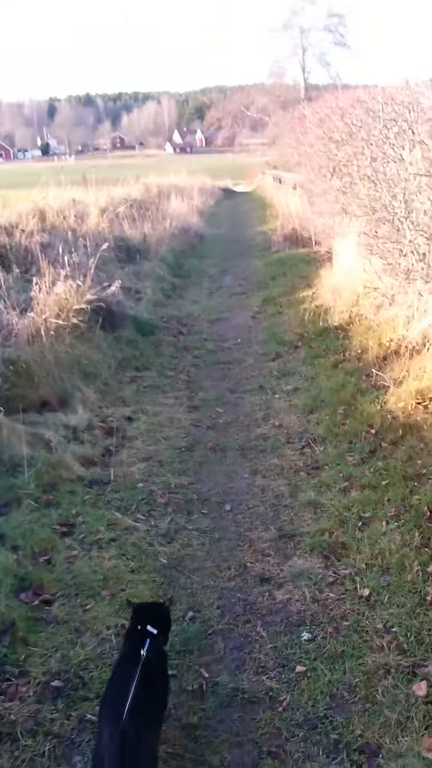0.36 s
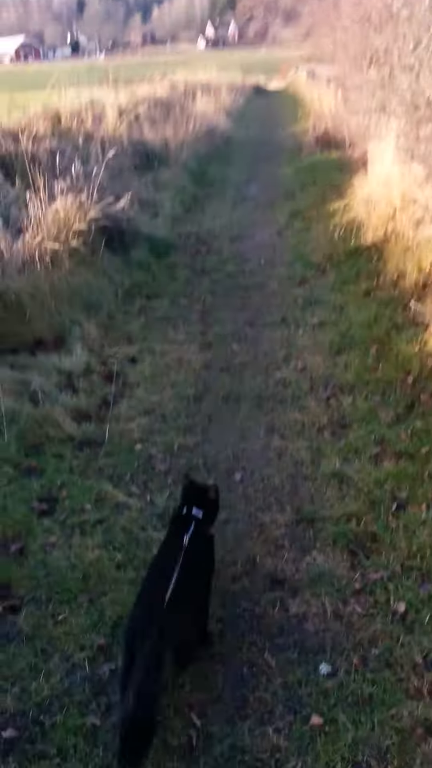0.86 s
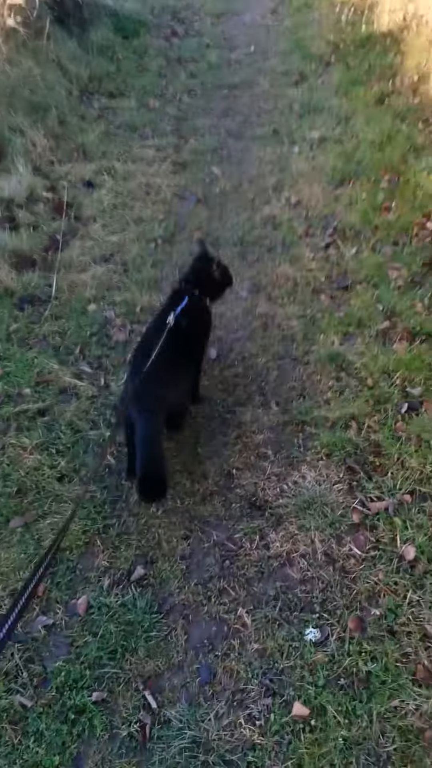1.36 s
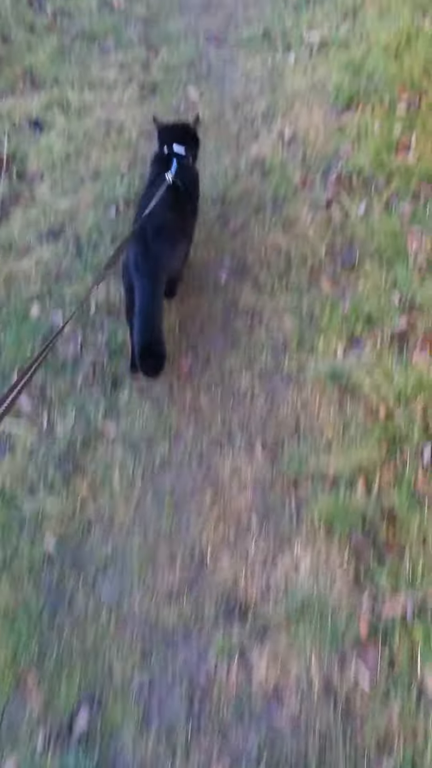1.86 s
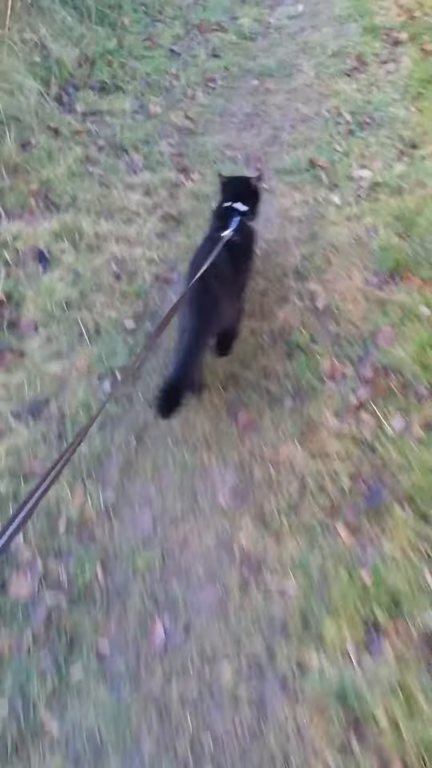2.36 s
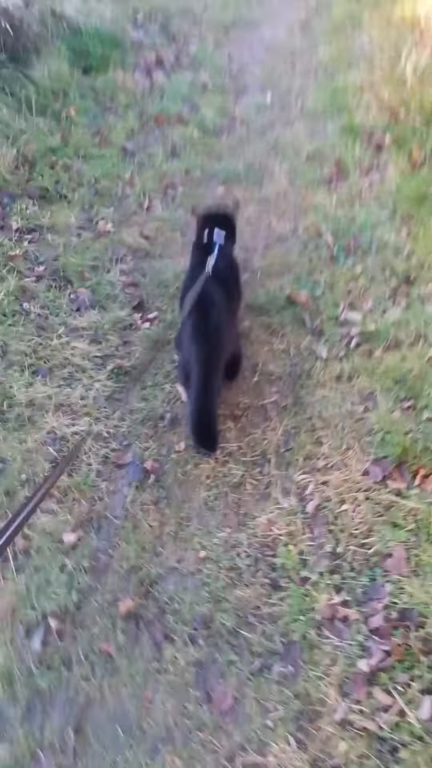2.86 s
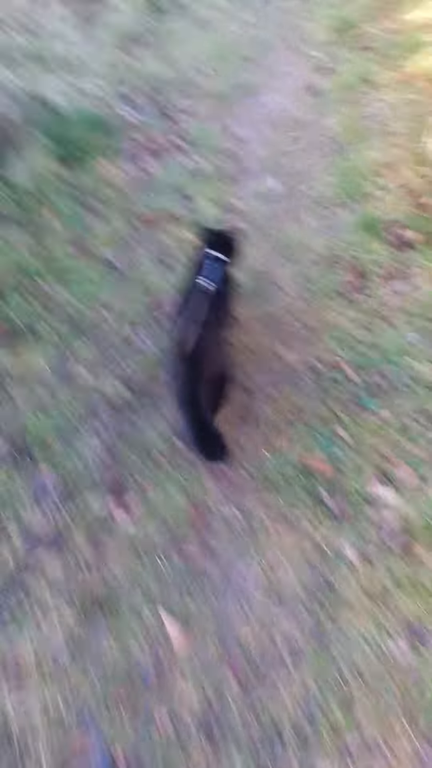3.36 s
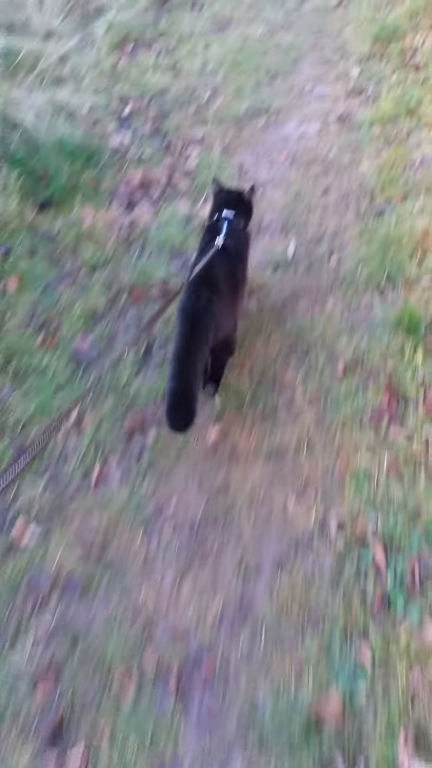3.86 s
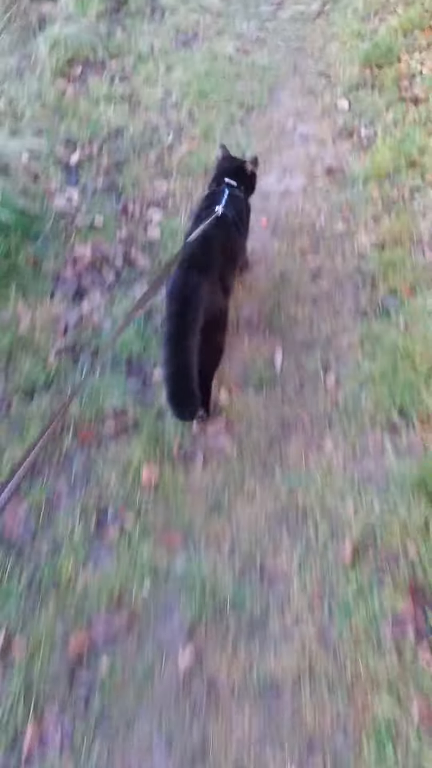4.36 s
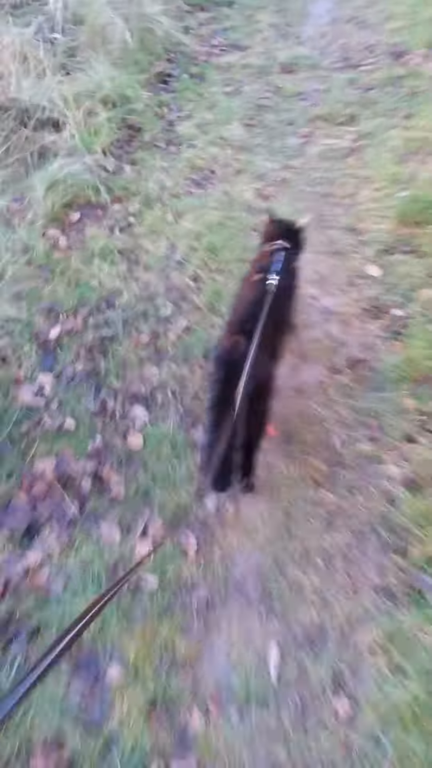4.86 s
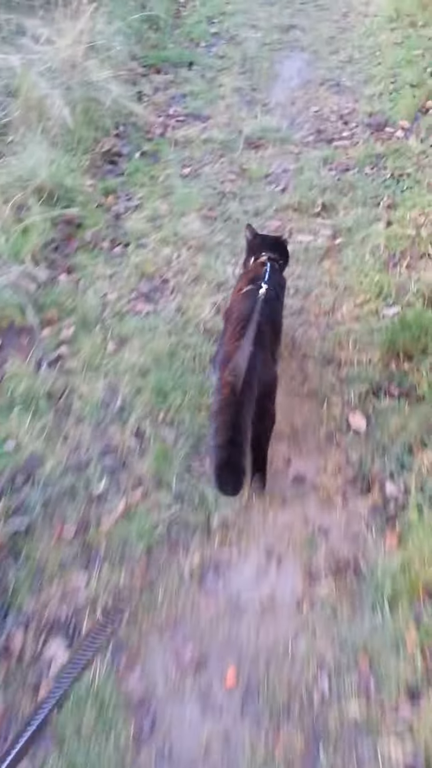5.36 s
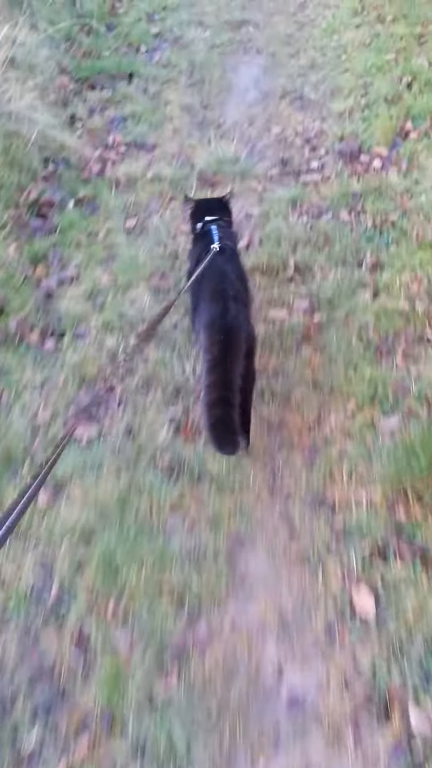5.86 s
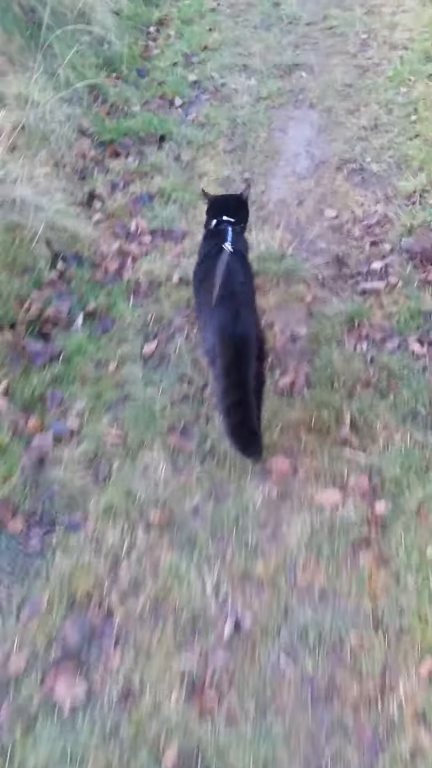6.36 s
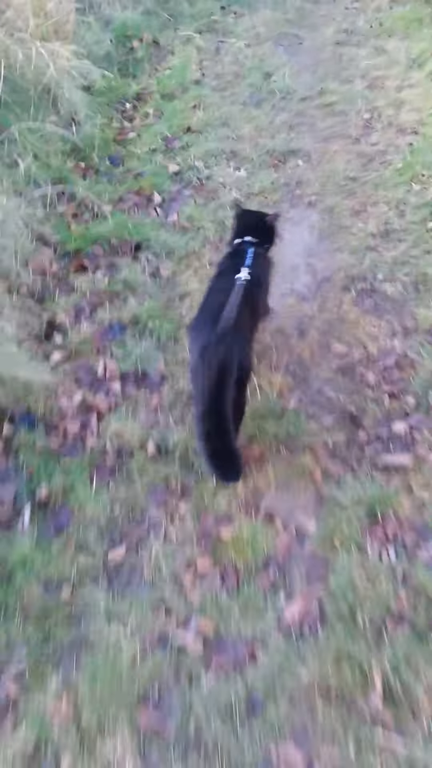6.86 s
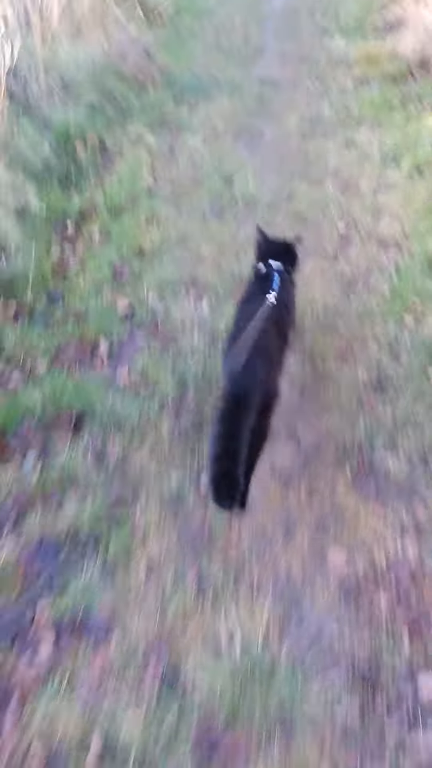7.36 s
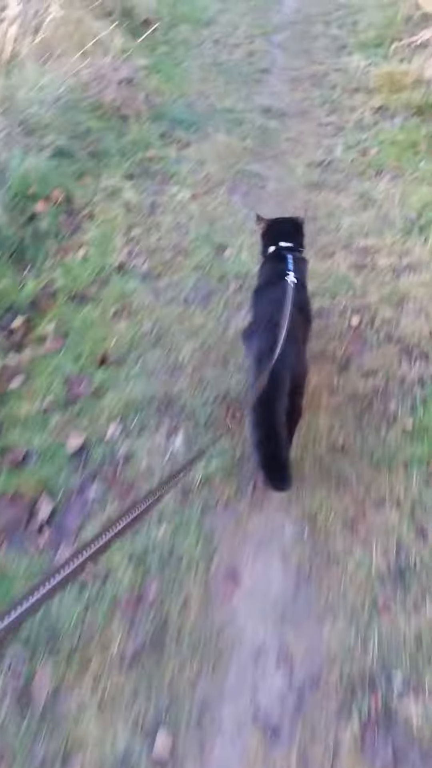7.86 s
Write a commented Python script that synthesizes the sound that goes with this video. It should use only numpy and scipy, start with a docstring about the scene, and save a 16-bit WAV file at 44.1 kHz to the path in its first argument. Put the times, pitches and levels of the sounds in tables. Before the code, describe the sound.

Brisk, uneven swishes of someone striding through dry grass and leaves, with crisp crackles, faint tag ticks, small wind thumps and distant traffic hum.

```python
"""Frosty grass path amid fields: a walker follows a cat on a lead, in the hand a phone with two microphone ports.
Each stride swishes through grass and leaves: rubbed noise, levelled stroke by stroke, with small leaf cracks.
Stalks and leaves snap and rustles start sharply (tick, mode, band of noise); a harness tag tinks (damped modes).
Puffs of air thump on one port or the other (filtered pulses) over a weak flutter (low noise).
Far traffic hums (coloured noise) and a faint tone comes and goes (swept sine)."""
import sys
import numpy as np
from scipy import signal
from scipy.fft import rfft, irfft
from scipy.io import wavfile
from scipy.ndimage import uniform_filter1d

SR = 44100
rng = np.random.default_rng(int(sys.argv[2]) if len(sys.argv) > 2 else 0)


def file_out(sig):
    """Save sig as 16-bit WAV at sys.argv[1]."""
    # one column per channel
    cols = np.atleast_2d(sig).T
    # limit, then scale
    lim = np.clip(cols, -1, 1)
    pcm = np.round(lim * 32767).astype(np.int16)
    wavfile.write(sys.argv[1], SR, pcm)


def invert_db(x):
    """Field ratio 10**(x/20) for x, a level in decibels (scalar or array-like)."""
    u = np.asarray(x, float) / 20
    return 10 ** u


N = 363825
T = np.arange(N) / SR
CONTROL_STEP = 64  # samples per control value

# strokes of a leg or sleeve through cloth, grass and leaves:
# (start [s], length [s], hiss at the start [dB], swell to the end [dB], left minus right [dB])
STROKES = [(0.01, 0.23, -45.5, -10.5, 7), (0.159, 0.16, -47, 4, 5), (0.47, 0.11, -49.5, -3.5, 5),
           (0.634, 0.052, -50, -10, 3), (0.791, 0.053, -45, -2.5, 6.0), (0.856, 0.12, -39.5, -3, 7),
           (0.998, 0.12, -48, -9, 5.5), (1.155, 0.079, -47.5, -12, 3.5), (1.284, 0.025, -51.0, 12, 2),
           (1.36, 0.18, -55.5, 16, 4.5), (1.433, 0.17, -46.0, 8, 9), (1.749, 0.21, -47.5, -9.5, 5),
           (1.968, 0.028, -54.5, 4, 4), (2.083, 0.13, -44.5, -1.5, 3.0), (2.323, 0.058, -53.5, -1.0, 6.0),
           (2.435, 0.13, -57.5, 8, 7.5), (2.717, 0.061, -47, 4.5, 6.0), (2.79, 0.058, -38, 1.5, 9),
           (2.988, 0.21, -47.0, -1.0, 6.0), (3.212, 0.13, -53.5, -7.5, 10), (3.417, 0.11, -41.5, 0.5, 5.5),
           (3.575, 0.17, -50.5, 1.5, 6), (3.79, 0.16, -49, -5, 8), (4.072, 0.15, -41.5, -0.5, 6.5),
           (4.325, 0.1, -51.5, 0, 7), (4.466, 0.18, -42, -20.5, 3.5), (4.732, 0.099, -42, -1, 6.5),
           (4.967, 0.21, -52.5, 6.5, 9.5), (5.206, 0.053, -46, -4, 9), (5.435, 0.12, -43.5, 3.5, 8),
           (5.676, 0.21, -53.5, 1.5, 6), (5.929, 0.011, -52.0, 0, 5), (5.992, 0.049, -55, 0.5, 9.5),
           (6.125, 0.091, -43.5, -1, 3.5), (6.394, 0.2, -50.5, 0.5, 6.5), (6.567, 0.21, -47.5, -19.5, 2.5),
           (6.765, 0.11, -47.0, 7.5, 6), (6.9, 0.043, -44, -4, 9), (7.034, 0.038, -49.5, -1, 10),
           (7.157, 0.24, -48.5, 0, 7.0), (7.458, 0.06, -45, 7, 10.5), (7.535, 0.082, -42, -9.5, 9),
           (7.662, 0.24, -54.5, 9.5, 10), (7.926, 0.12, -45.5, -6.0, 10.5), (8.161, 0.064, -46.5, 6, 8.5)]
# slow changes of the swish's colour: (time [s], lift of the lower hiss [dB], lift of the dull part [dB])
SWISH_COLOUR = [(0, -7, -2.5), (0.9, -3.5, 0), (1.5, -1.5, -1), (2.4, 1.5, 0.5), (3.3, 0, 0),
                (4.3, -1, -0.5), (5.1, 0.5, 1.5), (6.2, 1.5, -1), (7.1, 2.5, -1.5), (7.8, 4.5, 3.5),
                (8.25, 9.5, 3)]
# snaps of stalks and leaves, sharp onsets of rustles, two low scuffs and a tag tink near 5.72 s,
# level ahead of the common gain and the ports:
# (time [s], level [dB], ring [Hz], ring t60 [s], left minus right [dB])
SHARP_ONSETS = [(0.44, -48.5, 500, 0.013, 1), (0.549, -34, 8000, .002, 5),
                (0.6237, -26.5, 4100, 0.0056, -1), (0.628, -27.5, 4200, 0.0037, 25),
                (0.633, -42, 5200, 0.011, 1), (1.1526, -27, 5800, 0.0013, 8), (1.41, -34, 5770, 0.012, -8),
                (1.28, -39, 5540, 0.0064, 2), (1.313, -37, 6160, 0.011, 7), (1.76, -47, 464, 0.013, 6),
                (3.3854, -44, 5970, 0.011, -5), (4.463, -34, 7060, 0.006, -10),
                (4.4635, -32, 3000, 0.0049, 3), (4.4657, -24.5, 3600, 0.007, 2),
                (4.484, -38, 3740, .015, 6), (4.498, -33, 3900, 0.013, 10),
                (4.5092, -21.5, 3180, 0.006, -5), (4.552, -35.5, 3230, 0.0039, 6),
                (4.5545, -36, 5850, 0.0066, 1), (5.414, -44, 5800, 0.0074, -3),
                (5.717, -43, 5630, 0.0092, 3), (5.927, -47, 5800, 0.0073, 5), (6.098, -48, 6170, .008, 7),
                (6.155, -41, 6340, .012, 3), (6.212, -39.5, 6260, .015, 3), (6.5491, -41.5, 6600, 0.023, 3),
                (6.7243, -44, 7000, .015, 3), (6.7596, -45, 6680, 0.012, 3),
                (7.015, -30.5, 10300, 0.0035, 15), (7.1482, -24, 8700, 0.0017, 18),
                (8.089, -46.5, 2860, 0.0034, 7)]
# knocks of the tag on the harness, ahead of the port gains: (time [s], level [dB])
TAG_KNOCKS = [(0.469, -45), (1.43, -41), (1.447, -47), (1.836, -43), (2.513, -48), (3.495, -46),
              (4.427, -50), (5.723, -48), (5.74, -47), (6.414, -50), (6.452, -45), (6.481, -48),
              (6.922, -51), (6.968, -43), (7.208, -50), (7.732, -50)]
# modes of the tag: (nominal pitch [Hz], relative level [dB], t60 [s])
TAG_MODES = [(4915, 0, .03), (4935, -10, .13)]
# eddies that hit one port: (time [s], peak [dB], port [0 left, 1 right])
PUFFS = [(0.074, -47, 0), (0.26, -48, 1), (0.627, -38, 1), (0.738, -33, 0), (0.807, -40, 0),
         (0.846, -32, 1), (0.906, -41, 0), (0.908, -30, 1), (1.27, -45, 1), (1.269, -41, 0),
         (1.308, -44, 0), (1.333, -43, 0), (2.51, -41, 0), (3.315, -40.5, 1), (3.992, -47, 0),
         (4.129, -43, 0), (4.801, -38.5, 0), (5.934, -41, 0), (6.684, -45.5, 0), (6.788, -51, 0),
         (6.832, -46, 0), (7.15, -45, 0), (7.864, -35.5, 0), (7.891, -33.5, 0), (7.925, -32, 0),
         (7.995, -41, 0), (8.026, -42, 0), (8.057, -38.5, 0), (8.214, -48, 1)]
# gusts on the phone: (start [s], length [s], left port [dB], right port [dB])
GUSTS = [(0.07, 0.14, -68, -72), (0.74, 0.027, -52.5, -57), (0.84, 0.058, -49.5, -54),
         (1.297, 0.05, -56, -58), (2.51, 0.026, -59, -80), (2.734, 0.039, -66, -76), (3.983, .18, -60, -73),
         (4.78, .08, -59, -73), (5.228, 0.34, -64.5, -77), (5.897, 0.043, -54, -77),
         (6.047, 0.045, -55, -70), (6.697, 0.15, -60.5, -71), (7.394, .16, -63, -68), (7.89, .06, -44, -56),
         (7.957, 0.086, -49, -63), (8.2, .06, -59, -61)]
# far tone: (time [s], pitch [Hz], level [dB])
DRONE = [(2.95, 362.5, -84), (3.5, 352, -75), (3.95, 351, -75)]
# spectrum of the fields: (frequency [Hz], relative density [dB per Hz])
FIELDS = [(88, -36.5), (150, -5), (545, -6.5), (1020, 8), (2180, -6), (4160, -17), (5850, -14),
          (9400, -9.5), (14000, -2.5)]
# swell and fade of the far traffic: (time [s], gain [dB])
TRAFFIC = [(0, 1.5), (2, -0.5), (4.5, 1), (6.3, -1.5), (8.25, 0)]
# small cavity ahead of each port: (frequency [Hz], left gain [dB], right gain [dB])
PORTS = [(190, -8, -12.5), (1170, -6, -8.5), (2090, -6, -11.5), (3050, -9, -10), (4050, -9, -11),
         (4700, -7, -11), (5830, -1.5, -7), (6960, -6, -1), (8000, -10, -8), (9400, -12.5, -11),
         (13200, -13.5, -18.5), (15700, -12.5, -18)]


def level(x, db=0):
    """Scale each channel to an rms level."""
    return x * invert_db(db) / np.sqrt(np.mean(x ** 2, axis=-1, keepdims=True))


def curves(table):
    """Columns of a table as one value per sample."""
    time_s, *columns = np.transpose(table)
    return [np.interp(T, time_s, column) for column in columns]


def sides(db, pan_db):
    """Left and right gains of unrelated sounds whose mean has the level db."""
    tilt = invert_db(np.array([pan_db, -pan_db]) / 2)
    return 2 * invert_db(db) * tilt / np.sqrt(invert_db(pan_db) + invert_db(-pan_db))


def colour(x, hz, db):
    """Causal filter through (Hz, dB) points, from the cepstrum of the log gain."""
    grid_hz = np.arange(513) * SR / 1024
    gain_db = np.interp(np.log(grid_hz + 1), np.log(hz), db)
    cepstrum = irfft(np.log(invert_db(gain_db)))
    # fold the negative times onto the positive ones
    cepstrum[1:512] *= 2
    cepstrum[513:] = 0
    impulse = irfft(np.exp(rfft(cepstrum)))
    return signal.fftconvolve(x, impulse)[:N]


def ports(x):
    """Colour of the two port cavities."""
    hz, left_db, right_db = np.transpose(PORTS)
    return np.array([colour(x[0], hz, left_db), colour(x[1], hz, right_db)])


def cut(x, hz, kind, order=2):
    """Causal Butterworth filter."""
    return signal.sosfilt(signal.butter(order, hz, kind, fs=SR, output="sos"), x)


def part(x, hz, kind):
    """A part of the spectrum, in phase with the whole."""
    return signal.sosfiltfilt(signal.butter(2, hz, kind, fs=SR, output="sos"), x)


def walk(rate_hz):
    """Random levels held 1 / rate_hz and slewed twice."""
    hold = int(SR / rate_hz)
    steps = np.repeat(rng.standard_normal(N // hold + 1), hold)
    return 1.01 * uniform_filter1d(uniform_filter1d(steps, hold), hold)[:N]


def add(track, time_s, shape):
    """Mix a short sound in at a time."""
    i = int(time_s * SR)
    track[..., i:i + shape.shape[-1]] += shape[..., :N - i]


def ring(hz, t60_s, phase=0.):
    """A struck mode: a sine that decays exponentially."""
    t = np.arange(int(t60_s * SR)) / SR
    return np.sin(2 * np.pi * hz * t + phase) * np.exp(-np.log(1000) * t / t60_s)


def bursts(start_s, length_s, db, swell_db, rise_db_s, fall_db_s):
    """Power of each event over time: a steep rise, a hold that swells or fades, a steep fall."""
    t = T[::CONTROL_STEP] - start_s[:, None]
    length_s = np.maximum(length_s, .005)[:, None]
    held_db = db[:, None] + swell_db[:, None] * np.clip(t / length_s, 0, 1)
    before_db = rise_db_s * np.maximum(-t, 0)
    after_db = fall_db_s * np.maximum(t - length_s, 0)
    return invert_db(2 * (held_db - before_db - after_db))


def smooth(control):
    """Round the corners of a control over 15 ms and give one value per sample."""
    return np.interp(T, T[::CONTROL_STEP], uniform_filter1d(control, size=10))


def strokes():
    """Level of all strokes together, and their direction, weighted by each stroke's power."""
    still_power = invert_db(2 * -81.5)  # hiss between strokes
    start_s, length_s, db, swell_db, pan_db = np.transpose(STROKES)
    power = bursts(start_s, length_s, db, swell_db, rise_db_s=452, fall_db_s=280)
    total = power.sum(axis=0) + still_power
    pan = (pan_db @ power + pan_db.mean() * still_power) / total
    return 10 * np.log10(smooth(total)), smooth(pan)


def slips(scatter_db, patchy_db):
    """Dense tiny slips of fibres, a few much larger, in quick patches."""
    size_db = scatter_db * np.minimum(rng.exponential(size=N), 5)
    return rng.standard_normal(N) * invert_db(size_db + patchy_db * walk(180))


def rubbing(shared, scatter_db, patchy_db):
    """Spots below the phone reach the left port first, each by its own lag; the rest scatters to each port alone."""
    direct = 0
    for lag in range(14, 19):  # samples
        spot = slips(scatter_db, patchy_db)
        direct = direct + np.array([spot, np.roll(spot, lag)])
    scattered = np.array([slips(scatter_db, patchy_db) for _ in range(2)])
    # shared is a share of power
    return ports(np.sqrt(shared) * level(direct) + np.sqrt(1 - shared) * level(scattered))


def swish():
    """Fine fibres hiss, larger folds give a duller part; the ports differ less in the lows."""
    db, pan_db = strokes()
    # the pressure of the stride is uneven
    db = db + 1.2 * walk(45)
    low_lift_db, dull_lift_db = curves(SWISH_COLOUR)
    dull_db = -12 + dull_lift_db
    low_db = -0.07 + low_lift_db
    high_db = -0.3 + 0.4 * low_lift_db + 0.53 * (pan_db - pan_db.mean())

    hiss = cut(rubbing(shared=0.31, scatter_db=2.0, patchy_db=2.0), 3634, "high", order=4)
    hiss = level(hiss, 0.51)
    # each size of fibre catches and lets go on its own
    low = (invert_db(low_db + 3.7 * walk(22)) - 1) * part(hiss, 4470, "low")
    high = (invert_db(high_db + 0.43 * walk(13)) - 1) * part(hiss, 10600, "high")

    dull = cut(rubbing(shared=0.45, scatter_db=3.0, patchy_db=2.0), 3620, "low", order=4)
    dull = level(cut(dull, 177, "high"), 1.78)
    dull = dull * sides(db + dull_db + 1.08 * walk(15), 0.57 * pan_db)
    return (hiss + low + high) * sides(db, pan_db) + dull


def flecks():
    """Single leaves crack here and there, as loud as the strokes allow, each with its own short ring and side."""
    rate_hz, typical_hz, spread_octaves, typical_t60_s = 70, 5800, 0.402, 0.009
    offset_db, scatter_db = -4.5, 4  # against the stroke level, ahead of the common gain
    out = np.zeros((2, N))
    db, pan_db = strokes()
    for when, size, pitch, lasts, side in rng.random((int(rate_hz * N / SR), 5)):
        i = int(when * (N - 20))
        # logistic spread of pitch
        hz = typical_hz * 2 ** (spread_octaves * np.log(pitch / (1 - pitch)) / 2)
        crack = ring(np.clip(hz, 600, 13000), typical_t60_s * (.3 + 1.4 * lasts))
        crack_db = db[i] + offset_db - scatter_db * max(np.log(size), -3)
        left, right = sides(crack_db, pan_db[i] + 14 * (side - .5))
        add(out[0], i / SR, left * crack)
        add(out[1], i / SR + .00036, right * crack)
    return invert_db(9) * ports(out)


def sharp_onsets():
    """Snaps, rustle onsets, scuffs and a tink: a sharp tick, then a short rough ring."""
    out = np.zeros((2, N))
    for time_s, db, hz, t60_s, pan_db in SHARP_ONSETS:
        band_hz = [hz / 1.45, min(hz * 1.45, .45 * SR)]
        grit = cut(rng.standard_normal(8192), band_hz, "band")
        mode = ring(hz, t60_s)
        fade = ring(0, 5.4 * t60_s, np.pi / 2)  # at 0 Hz, the bare decay
        onset = 0.47 * fade * grit[:len(fade)]
        onset[:len(mode)] += mode
        onset[:2] += 1.5 * np.array([1, -1])  # the tick
        left, right = sides(db, pan_db)
        add(out[0], time_s, left * onset)
        add(out[1], time_s + 0.00032, right * onset)
    return invert_db(9.5) * ports(out)


def tag():
    """Short damped knocks with a faint longer ring; the swinging tag rattles softly around each one."""
    out = np.zeros(N)
    for time_s, db in TAG_KNOCKS:
        chance = rng.random((5, 3))
        knocks = [(time_s, db, chance[0, 2])]
        for when, soft, detune in chance[1:]:
            knocks.append((time_s + .14 * (when - .4), min(db, -44) - 6 - 9 * soft, detune))
        for at_s, knock_db, detune in knocks:
            for hz, mode_db, t60_s in TAG_MODES:
                mode = ring(hz * (1 + .012 * (detune - .5)), t60_s)
                add(out, at_s, invert_db(knock_db + mode_db) * mode)
    return out * invert_db(np.array([[-4.], [-1.]]))


def breeze():
    """Strength of the flutter at each port: gusts over calm air."""
    start_s, length_s, *port_db = np.transpose(GUSTS)
    power = []
    for db, calm_db in zip(port_db, (-70, -74)):
        gusts = bursts(start_s, length_s, db, 0 * db, rise_db_s=260, fall_db_s=190)
        power.append(smooth(gusts.sum(axis=0) + invert_db(2 * calm_db)))
    return np.sqrt(power)


def wind():
    """An eddy pushes the membrane, which swings back through its vent; a weak random flutter goes on between."""
    out = np.zeros((2, N))
    t = np.arange(-.01, .06, 1 / SR)
    for time_s, peak_db, port in PUFFS:
        # at the left port the air strikes, at the right one it sweeps past: push, then pull
        if round(port):
            push = np.gradient(np.exp(-(t / 0.0026) ** 2))
        else:
            push = np.exp(-(t / 0.0021) ** 2)
        swing = cut(cut(push, 60, "high"), 45, "high", order=1)
        add(out[int(round(port))], time_s - .0105, invert_db(peak_db) * swing / np.abs(swing).max())
    flutter = rng.standard_normal((2, N)) * invert_db(3.8 * np.array([walk(25), walk(25)]))
    flutter = cut(cut(flutter, 140, "low", order=4), 46, "high")
    return out + level(flutter) * breeze()


def drone():
    """A faint far sine of gliding pitch and wavering level that comes and goes."""
    hz, db = curves(DRONE)
    gate = np.clip(np.minimum(T - DRONE[0][0], DRONE[-1][0] - T) / 0.085, 0, 1)
    tone = np.sin(2 * np.pi * np.cumsum(hz) / SR)
    return np.sqrt(2) * gate * invert_db(db + 1.7 * walk(22)) * tone


def fields():
    """Far traffic, alike at both ports in the bass, and faint hiss: coloured noise."""
    hz, db = np.transpose([(40, -10)] + FIELDS)
    mid, left, right = (colour(rng.standard_normal(N), hz, db) for _ in range(3))
    hum = 3.7 * cut(mid, 500, "low")
    hum = hum + np.array([left, right]) * invert_db(np.array([[1.5], [-1.5]]))
    hum = level(hum.ravel(), -63.5).reshape(2, N)  # both ports scaled as one
    return hum * invert_db(curves(TRAFFIC)[0] + 1.2 * walk(1.74) + 0.9 * walk(9))


def scene():
    """Everything that reaches the two ports."""
    return swish() + flecks() + sharp_onsets() + tag() + wind() + drone() + fields()


def roll_off(x):
    """The treble ends steeply here."""
    return signal.sosfilt(signal.butter(12, 15840, fs=SR, output="sos"), x)


def record(dry):
    """The phone cuts the top steeply and leaves a small offset."""
    low_pass = signal.ellip(10, .3, 65, 14440, fs=SR, output="sos")
    mix = signal.sosfilt(low_pass, dry) - .0003
    return roll_off(mix)


dry = scene()
out = record(dry)
file_out(out)
```